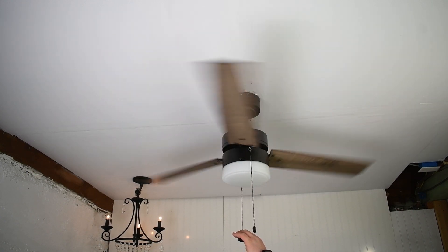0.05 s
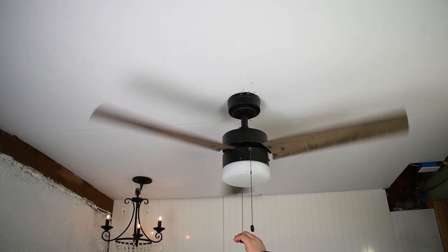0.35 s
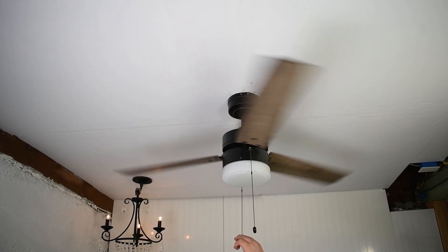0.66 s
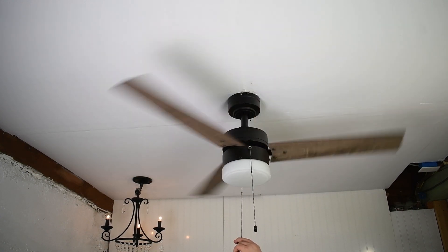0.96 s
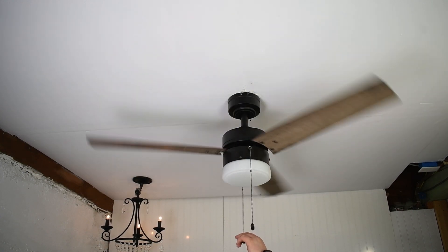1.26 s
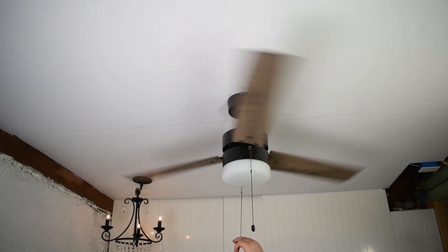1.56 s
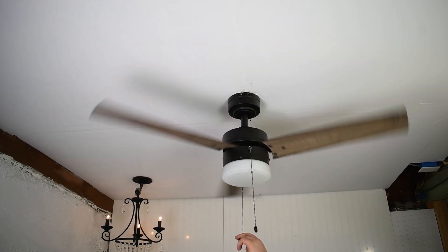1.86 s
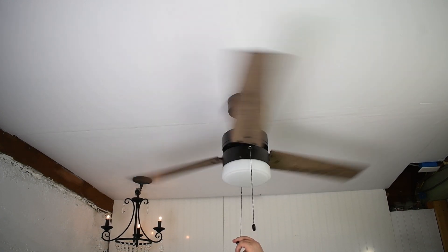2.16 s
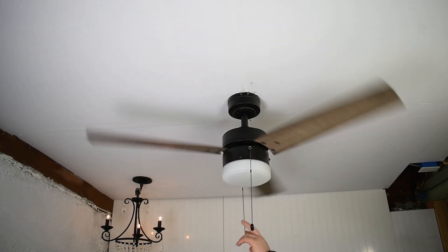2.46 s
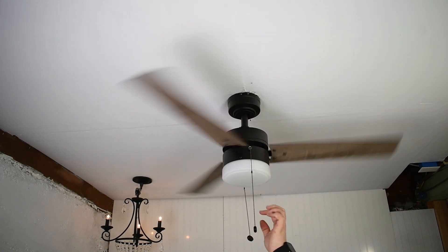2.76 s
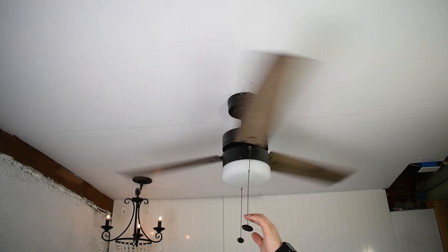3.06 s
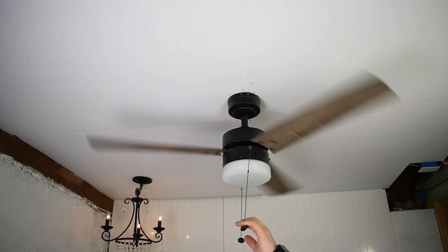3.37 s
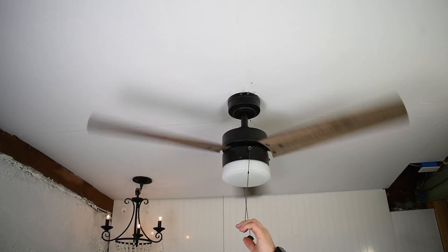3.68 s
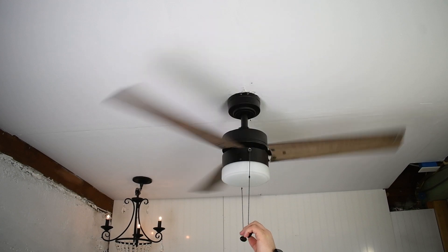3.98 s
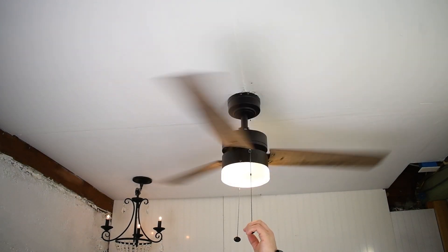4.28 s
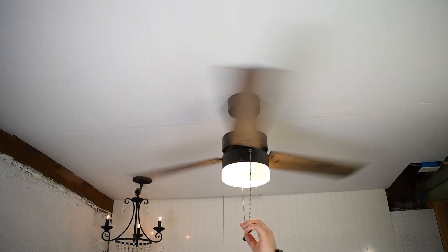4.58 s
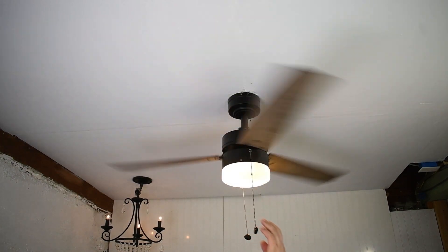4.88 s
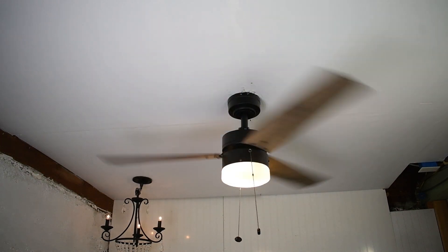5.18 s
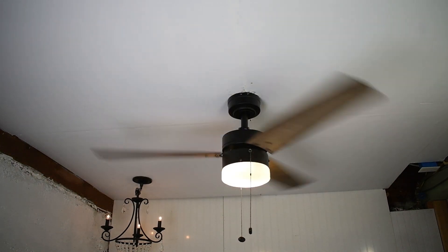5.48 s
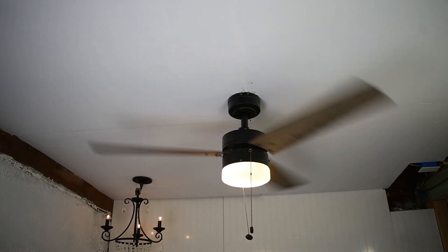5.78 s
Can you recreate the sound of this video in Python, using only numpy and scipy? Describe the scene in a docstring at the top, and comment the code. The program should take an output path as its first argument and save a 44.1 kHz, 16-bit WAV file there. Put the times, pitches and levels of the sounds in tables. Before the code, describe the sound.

Small metallic clicks stand out against the faint, steady hum and airy hiss of a ceiling fan in a small room. Chain beads tick, and a pull switch snaps and springs back three times, lightly jolting the fan housing. A short lull follows, then the lamp chain gives one more snap and a release click. Finally the dangling chain ends touch with a faint clink while the motor keeps running.

```python
"""A small, lightly furnished room: a ceiling fan turns slowly, its motor humming over stirred air.
After one faint tap, a hand pulls the speed chain three times and the lamp chain once. Beads tick over
the guide, the switch snaps over, and the chain's stop thumps the housing and the ceiling above it.
On each release the pawl ticks and the spring knocks the switch back.
At the end the swinging chain pendants clink together."""
import sys
import numpy as np
from scipy import signal
from scipy.fft import rfft, irfft
from scipy.io import wavfile
from scipy.ndimage import uniform_filter1d

SR = 44100
rng = np.random.default_rng(int(sys.argv[2]) if len(sys.argv) > 2 else 0)


def transcribe(u):
    """Save the signal u as a 16-bit wav file named by the first command-line argument.

    u: samples, shape (n,) or (channels, n), limited to [-1, 1]; the rate is SR.
    q: integer samples, one column per channel.
    """
    v = np.clip(np.atleast_2d(u).T, -1, 1)
    q = np.round(v * 32767).astype(np.int16)
    wavfile.write(sys.argv[1], SR, q)


N = 266408

# motor hum partials: pitch_hz, rms_db, waver_db
HUM_PARTIALS = [(120.05, -62, 1.04), (160.3, -77, 4), (241.2, -72, 3), (370, -82.5, 1)]
# EQ curves of the air bed: freq_hz, gain_db
HISS_EQ = [(180, -35), (300, -6), (326, -9), (360, -5), (511, -12.5), (749, -13.5), (1690, -18.5),
           (4090, -20), (5900, -21.5), (7690, -29.5), (8940, -23), (12500, -23.5), (15200, -23.5),
           (16000, -40)]
RUMBLE_EQ = [(20, -17.5), (33, -16.5), (50, -16), (70, -4.5), (95, -6), (130, -3), (165, -2), (200, -4),
             (280, -6.5), (400, -20.5), (1500, -80.5)]
# room decay: freq_hz, t60_s
ROOM_DECAY = [(310, 0.3), (1350, 0.25), (3650, 0.22), (6400, 0.21), (9600, 0.18), (14500, 0.15)]
# stereo lean of every click: freq_hz, left_minus_right_db
STEREO_LEAN = [(380, -2), (2400, -0.7), (5600, -2.5), (7600, -1.5), (9200, -7.5), (12100, -9.5),
               (15900, -2)]

# beads slipping over the guide: start_s, level_db
BEAD_CUES = [(0.609, -64.5), (0.7518, -57.5), (1.4175, -51.5), (1.4239, -44), (2.0005, -46.5),
             (2.012, -43.5), (3.6812, -48)]
# chain drawn taut ahead of each pull: start_s, tick_db, jolt_db
TUG_CUES = [(0.7723, -50, -48), (1.383, -54, -58), (1.9834, -51, -56), (3.8961, -50.5, -50)]
# pulls: snap_s, switch, snap_db, clack_db, treble_pan_db, thump_db, metal_db, ceiling_boom_db
PULL_CUES = [(0.8284, "speed", -24.5, -6, 1.5, -42, -10.5, 4), (1.4479, "speed", -26, 0.5, 4.5, -35, 0, 2),
             (2.0281, "speed", -30, 7, 2.5, -37.5, -3, -1), (4.0415, "lamp", -22, -1, 3.5, -38, -6.5, 5)]
# releases: knock_s, switch, knock_db, pawl_lead_s, rebound_lag_s, rebound_over_knock_db
RELEASE_CUES = [(1.1366, "speed", -32.5, 0.026, .0052, 3), (1.7559, "speed", -29, .030, .0092, 1),
                (2.3432, "speed", -27.5, .034, .005, -6.5), (4.337, "lamp", -31, 0.04, 0.0045, -10)]
# pendants touching: start_s, level_db
CLINK_CUES = [(5.5939, -51), (5.5979, -52), (5.702, -67.5)]

# EQ curve of each kind of contact: freq_hz, gain_db
TICK_EQ = [(180, -42.5), (300, -1), (425, -3), (634, -22.5), (1060, -10), (1660, -13), (2840, -6.5),
           (3760, -10.5), (5520, -5.5), (8090, -10.5), (9090, -7), (11900, -17.5), (16000, -37.5)]
SPEED_SNAP_EQ = [(400, -13), (700, -29.5), (1100, -10), (1600, -26.5), (2800, -16), (3800, -21.5),
                 (5600, -8.5), (6500, -6.5), (7600, -13), (9100, -1), (10500, -10), (16000, -21.5)]
LAMP_SNAP_EQ = [(400, -14), (720, -21.5), (950, -13.5), (1600, -23), (2050, -14), (2700, -24), (4700, -15),
                (6200, -6.5), (7200, -8.5), (8200, -4), (9500, -1), (11000, -10), (12500, -7), (16000, -20)]
SPEED_KNOCK_EQ = [(400, -14.5), (780, -11), (1150, -2), (1600, -9.5), (2200, -5.5), (3300, -5), (4000, -4),
                  (5400, -1.5), (7400, -4.5), (9200, 0), (10700, -12), (12500, -15.5), (16000, -21.5)]
LAMP_KNOCK_EQ = [(400, -11.5), (650, -7.5), (870, 4), (1200, 0.5), (1550, -8.5), (2150, -2.5), (3500, -7.5),
                 (6000, -4), (9500, -3), (12000, -16), (16000, -26)]
CLINK_EQ = [(1250, -15), (1800, 1.5), (2550, -17), (4250, -0.5), (6250, -3), (7550, -5), (9350, -0.5),
            (11100, -17), (15900, -30)]
# resonances of the metal parts in each contact: centre_hz, width_hz, lift_db
TICK_RESONANCES = [(2910, 98, 2.3), (3260, 43, 6), (5200, 90, 6), (9260, 130, 4.1)]
SPEED_SNAP_RESONANCES = [(2628, 70, 10.5), (4710, 80, 8), (5200, 110, 3), (8380, 110, 7), (9424, 110, 7)]
LAMP_SNAP_RESONANCES = [(8150, 110, 8), (8690, 71, 8), (9507, 90, 8.4), (11290, 120.4, 6.5)]
SPEED_KNOCK_RESONANCES = [(2160, 100, 5), (2837, 90, 4), (3300, 200, 4), (4527, 70, 13), (5326, 90, 8),
                          (5680, 160, 4), (6772, 120, 4), (8952, 140, 3)]
LAMP_KNOCK_RESONANCES = [(856, 88, 4.4), (1095, 73, 4.3), (1200, 96, 5.2), (2144, 61, 11.8),
                         (5800, 140, 3.6), (6772, 120, 5)]
# ringing bodies (switch cup, fan housing, ceiling at the mount, pendant): pitch_hz, level_db, t60_s
CUP_MODES = [(356, -4, 0.24), (360, -12, 0.16), (363, -2, 0.17), (461.7, -2.5, 0.2), (652, -4.5, 0.097),
             (1027, -6.5, 0.14)]
HOUSING_MODES = [(217.9, -19, .15), (258, -13, 0.19), (304, -5.5, 0.25), (330.8, -5, 0.22),
                 (359, -1.5, 0.15), (384.3, 4.5, 0.14), (489, -14.5, 0.19), (573, -19.5, 0.27),
                 (1057, -6, 0.22), (1817, -7, 0.29), (2042, -17.5, .22), (2910, -14.5, .25),
                 (3120, -11.5, .26), (3190, -11.5, 0.17)]
CEILING_MODES = [(69.7, -7, 0.51), (82.8, -7.5, 0.27), (96, -13.5, 0.28), (58, -19.5, .2)]
PENDANT_MODES = [(1766, -13, 0.14), (1986, -2, 0.13), (3590, -18, 0.16), (3870, -4, 0.096),
                 (4257, 3.5, 0.087), (5200, 0, 0.11), (6460, -3, 0.19), (9480, -5, 0.19)]

SHOT = 32768  # samples in a one-shot, tail included
AGE = np.arange(SHOT) / SR
FREQ = np.maximum(np.fft.rfftfreq(SHOT, 1 / SR), 1)
SIDES = np.array([[1], [-1]])  # left, right


def undb(db):
    """Decibels to gain."""
    return 10 ** (np.asarray(db) / 20)


def unit(x):
    """Scale to rms 1."""
    return x / np.sqrt(np.mean(x ** 2))


def curve(points, freq):
    """Read (freq_hz, value) breakpoints on a log-frequency axis."""
    hz, value = np.transpose(points)
    return np.interp(np.log(freq), np.log(hz), value)


def drift(rate_hz):
    """Slow random modulator: stepped levels, smoothed twice, at rms 1."""
    hold = int(SR / rate_hz)
    steps = np.repeat(rng.standard_normal(N // hold + 1), hold)
    return unit(uniform_filter1d(uniform_filter1d(steps, hold), hold)[:N])


def minimum_phase(gain):
    """Filter response with the given gains that rings only after the hit."""
    cepstrum = irfft(np.log(gain + 1e-7))
    cepstrum[1:SHOT // 2] *= 2
    cepstrum[SHOT // 2 + 1:] = 0
    return np.exp(rfft(cepstrum))


def diffuse(size, wide_hz, treble_likeness):
    """Stereo noise spectra: nearly mono in the bass, opening out above wide_hz."""
    freq = np.fft.rfftfreq(size, 1 / SR)
    likeness = treble_likeness + (.95 - treble_likeness) / (1 + (freq / wide_hz) ** 2)
    mid, side = rfft(rng.standard_normal((2, size)))
    return (mid * np.sqrt(1 + likeness) + SIDES * side * np.sqrt(1 - likeness)) / np.sqrt(2)


def place(out, start_s, shot):
    """Mix a one-shot in at start_s, fading its second half."""
    start = int(start_s * SR)
    fade = np.minimum(np.linspace(2, 0, SHOT), 1) ** 2
    out[:, start:start + SHOT] += (shot * fade)[:, :N - start]


def motor_hum():
    """The windings hum at twice the mains rate; the turning blades make the weaker partials waver."""
    t = np.arange(N) / SR
    hum = np.zeros(N)
    for hz, rms_db, waver_db in HUM_PARTIALS:
        level = np.sqrt(2) * undb(rms_db + waver_db * drift(7.8))
        wobble = .33 * waver_db * drift(9.7)
        hum += level * np.sin(2 * np.pi * hz * t + wobble)
    return hum


def air_bed():
    """Low rumble of stirred air under a smooth, faint hiss."""
    freq = np.maximum(np.fft.rfftfreq(N, 1 / SR), 1)
    hiss = irfft(diffuse(N, wide_hz=840, treble_likeness=.019) * undb(curve(HISS_EQ, freq)), N)
    rumble = irfft(diffuse(N, wide_hz=650, treble_likeness=.05) * undb(curve(RUMBLE_EQ, freq)), N)
    stir = undb(drift(6))
    return undb(-66.5) * unit(hiss) + undb(-68) * stir * unit(rumble)


def room_tail():
    """Dense reflections that die away, the treble first."""
    field = diffuse(SHOT, wide_hz=900, treble_likeness=.083)
    hz, t60s = np.transpose(ROOM_DECAY)
    bands = [irfft(field * np.interp(np.log(FREQ), np.log(hz), share)) for share in np.eye(len(hz))]
    return sum(band * np.exp(-np.log(1000) * AGE / t60) for band, t60 in zip(bands, t60s))


def click(walls, eq, resonances, direct_db, contact_s, clack_db=0, treble_db=0, treble_pan_db=0):
    """A brief metal contact rings its part and is heard directly, then off the walls."""
    chatter = rng.standard_normal(SHOT) * np.exp(-AGE / contact_s)
    chatter *= undb(direct_db) / np.sqrt(np.sum(chatter ** 2))
    direct = np.array([np.roll(chatter, 1), chatter])  # reaches the right a sample sooner
    # the turning blades change part of the reflections from one click to the next
    echoes = (2 * walls + room_tail()) / np.sqrt(5) * (1 - np.exp(-AGE / .0012))
    clack_bell = np.exp(-np.log2(FREQ / 1040) ** 2)
    treble_shelf = 1 / (1 + (5200 / FREQ) ** 3)
    lift_db = sum(db / (1 + (2 * (FREQ - hz) / width) ** 2) for hz, width, db in resonances)
    gain = unit(undb(curve(eq, FREQ))) * undb(lift_db + clack_db * clack_bell + treble_db * treble_shelf)
    gain /= np.sqrt(1 + (230 / FREQ) ** 6)  # small parts radiate no bass
    balance = undb(SIDES * (curve(STEREO_LEAN, FREQ) + treble_pan_db * treble_shelf) / 2)
    return irfft(rfft(direct + echoes) * minimum_phase(gain) * balance)


def ring(modes, swell_s, metal_db=0):
    """Decaying modes that swell as the room takes them up; metal_db trims those above 800 Hz."""
    out = np.zeros((2, SHOT))
    for hz, db, t60 in modes:
        vary_db, detune_hz, spread = rng.standard_normal(3)
        phase = rng.uniform(0, 2 * np.pi) + SIDES * spread * min(hz / 1200, 1)
        envelope = undb(db + vary_db + metal_db * (hz > 800)) * np.exp(-np.log(1000) * AGE / t60)
        out += envelope * np.sin(2 * np.pi * (hz + detune_hz) * AGE + phase)
    return out * (1 - np.exp(-AGE / swell_s))


def tick(walls, clack_db, treble_db, contact_s=.0015):
    """A small contact sets the switch cup ringing."""
    contact = click(walls, TICK_EQ, TICK_RESONANCES, direct_db=19.5, contact_s=contact_s,
                    clack_db=clack_db, treble_db=treble_db, treble_pan_db=.5)
    return contact + undb(-8.5) * ring(CUP_MODES, swell_s=.009, metal_db=-2)


def faint_tap(walls):
    """One dull tap ahead of the first pull."""
    out = np.zeros((2, N))
    place(out, start_s=.3125, shot=undb(-69.5) * tick(walls, clack_db=21, treble_db=-27))
    return out


def bead_scrape(walls):
    """A bead drags over the guide: a tick with a longer contact."""
    return tick(walls, clack_db=3, treble_db=-3.5, contact_s=.0035)


def housing_thump(metal_db, boom_db):
    """The taut chain jolts the motor housing, and through the downrod the ceiling."""
    housing = ring(HOUSING_MODES, swell_s=.023, metal_db=metal_db)
    ceiling = ring(CEILING_MODES, swell_s=.055)
    return undb(7) * housing + undb(boom_db) * ceiling


def chain_handling(walls):
    """Beads slip over the guide and the chain comes taut with a soft jolt."""
    out = np.zeros((2, N))
    for start_s, db in BEAD_CUES:
        place(out, start_s, undb(db) * bead_scrape(walls))
    for start_s, tick_db, jolt_db in TUG_CUES:
        place(out, start_s, undb(tick_db) * bead_scrape(walls))
        place(out, start_s, undb(jolt_db) * housing_thump(metal_db=-13.5, boom_db=-13))
    return out


def chain_pulls(walls):
    """The switch snaps over, then the chain hits its stop, thumps the housing and bounces once."""
    out = np.zeros((2, N))
    voices = {"speed": (SPEED_SNAP_EQ, SPEED_SNAP_RESONANCES),
              "lamp": (LAMP_SNAP_EQ, LAMP_SNAP_RESONANCES)}
    stop_lag_s, bounce_s = .009, .011
    for snap_s, switch, snap_db, clack_db, pan_db, thump_db, metal_db, boom_db in PULL_CUES:
        snap = click(walls, *voices[switch], direct_db=22.5, contact_s=.0018,
                     clack_db=clack_db, treble_pan_db=pan_db)
        place(out, snap_s, undb(snap_db) * snap)
        stop_s = snap_s + stop_lag_s
        place(out, stop_s, undb(thump_db) * housing_thump(metal_db, boom_db))
        stop_db = thump_db + metal_db + 1.5  # the more metal the stop rings, the louder it clacks
        for hit_s in (stop_s, stop_s + bounce_s):
            place(out, hit_s, undb(stop_db) * tick(walls, clack_db=7, treble_db=-9.5))
    return out


def chain_releases(walls):
    """The pawl ticks, then the spring knocks the switch back and it rebounds once."""
    out = np.zeros((2, N))
    voices = {"speed": (SPEED_KNOCK_EQ, SPEED_KNOCK_RESONANCES),
              "lamp": (LAMP_KNOCK_EQ, LAMP_KNOCK_RESONANCES)}
    for knock_s, switch, knock_db, pawl_lead_s, rebound_lag_s, rebound_db in RELEASE_CUES:
        pawl = tick(walls, clack_db=4.5, treble_db=3)
        place(out, knock_s - pawl_lead_s, undb(-44) * pawl)
        for hit_s, hit_db in ((knock_s, knock_db), (knock_s + rebound_lag_s, knock_db + rebound_db)):
            knock = click(walls, *voices[switch], direct_db=23, contact_s=.0018,
                          clack_db=-3, treble_db=1, treble_pan_db=2.5)
            cup = ring(CUP_MODES, swell_s=.0049)
            place(out, hit_s, undb(hit_db) * (knock + undb(-11.5) * cup))
    return out


def pendant_clinks(walls):
    """The let-go chain swings its pendant into the other one."""
    out = np.zeros((2, N))
    for start_s, db in CLINK_CUES:
        touch = click(walls, CLINK_EQ, resonances=[], direct_db=16, contact_s=.005)
        chime = ring(PENDANT_MODES, swell_s=.0011)
        place(out, start_s, undb(db) * (touch + undb(-1) * chime))
    return out


def scene():
    """Chains, switches and pendants share one room, over the bed of the running fan."""
    walls = room_tail()
    foley = faint_tap(walls) + chain_handling(walls) + chain_pulls(walls) + chain_releases(walls)
    return foley + pendant_clinks(walls) + motor_hum() + air_bed()


def record(dry):
    """A steep high cut at 16 kHz on the whole mix."""
    return signal.sosfilt(signal.ellip(8, .2, 70, 16000, fs=SR, output="sos"), dry)


dry = scene()
out = record(dry)
transcribe(out)
```